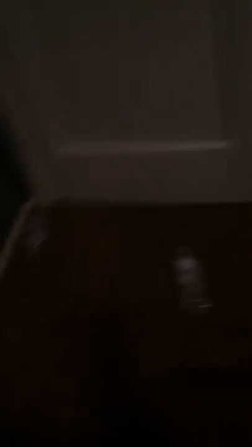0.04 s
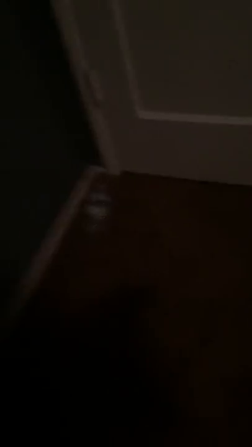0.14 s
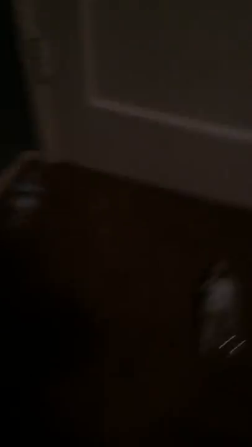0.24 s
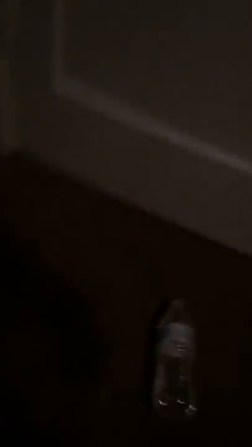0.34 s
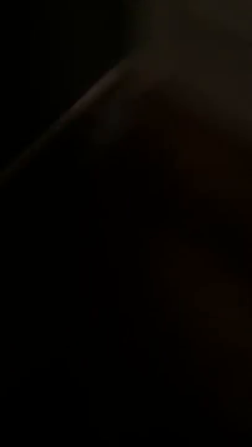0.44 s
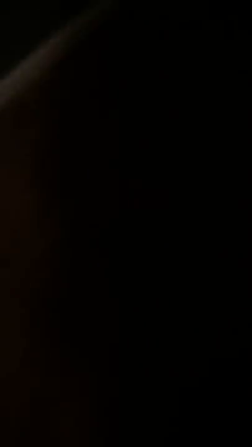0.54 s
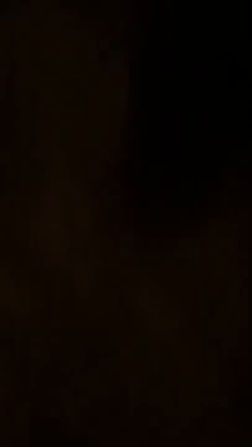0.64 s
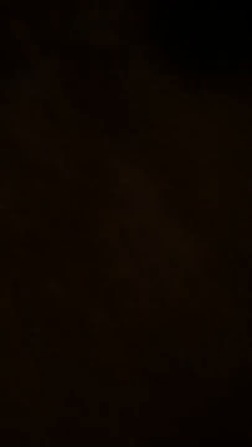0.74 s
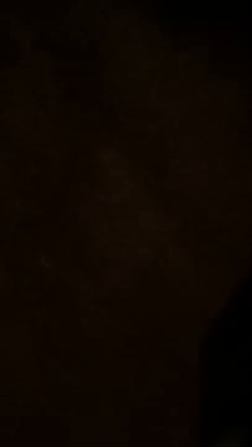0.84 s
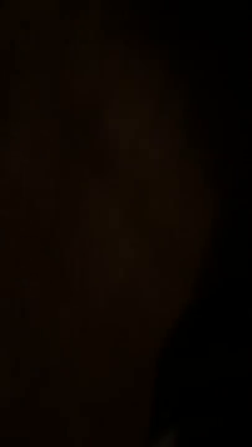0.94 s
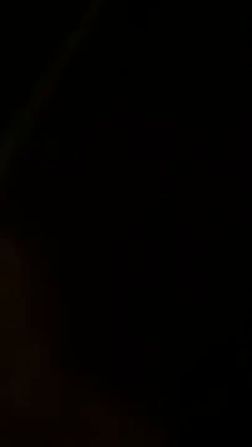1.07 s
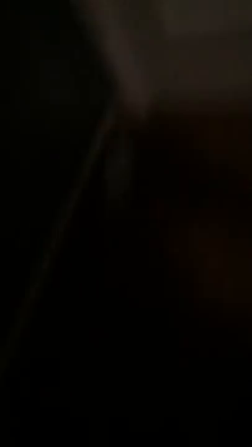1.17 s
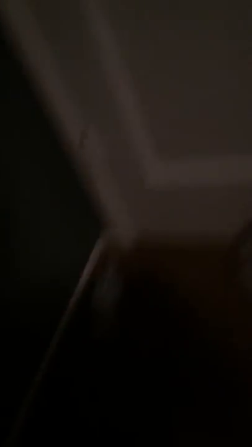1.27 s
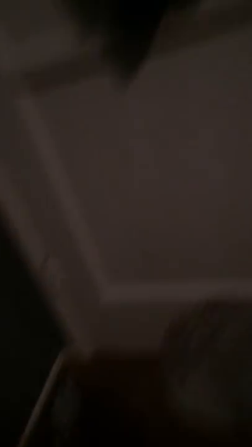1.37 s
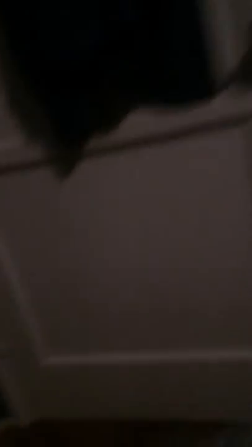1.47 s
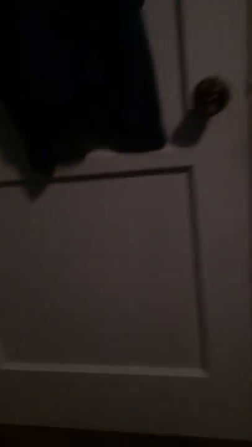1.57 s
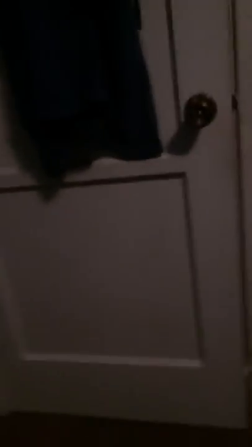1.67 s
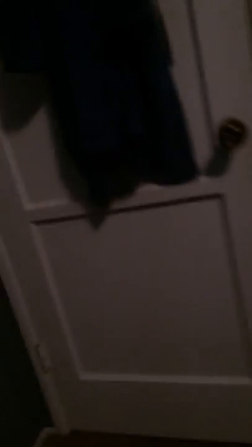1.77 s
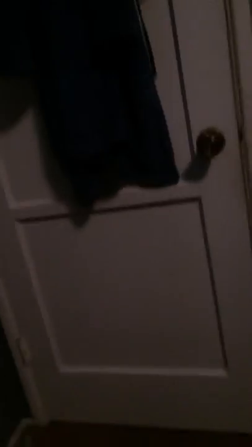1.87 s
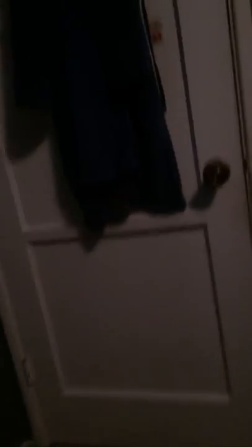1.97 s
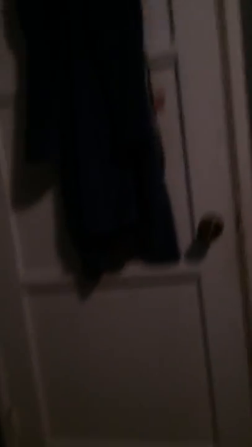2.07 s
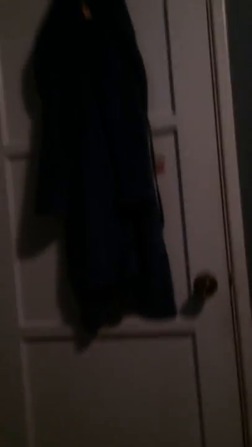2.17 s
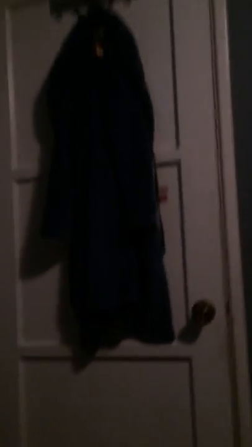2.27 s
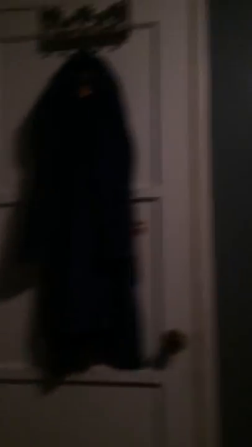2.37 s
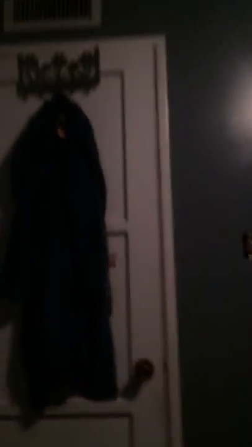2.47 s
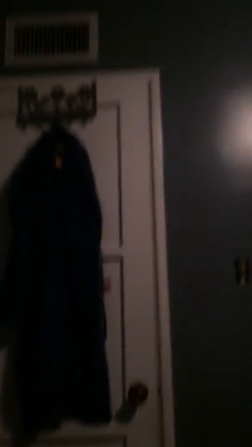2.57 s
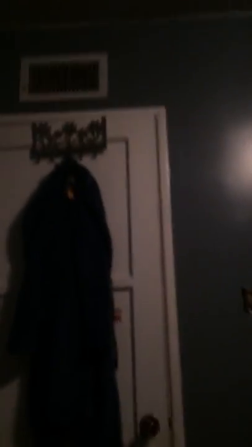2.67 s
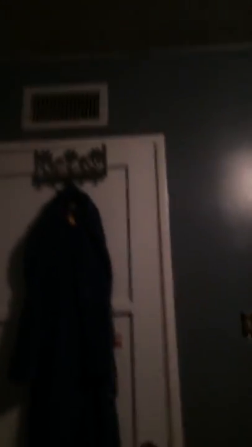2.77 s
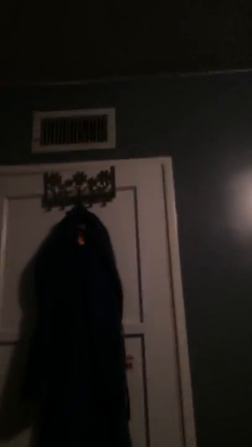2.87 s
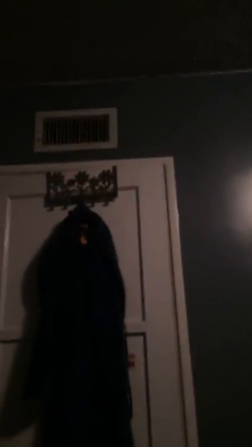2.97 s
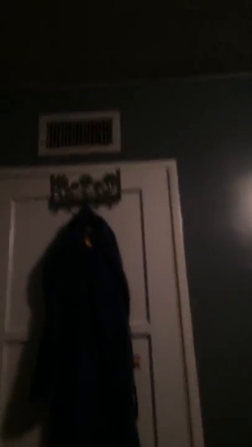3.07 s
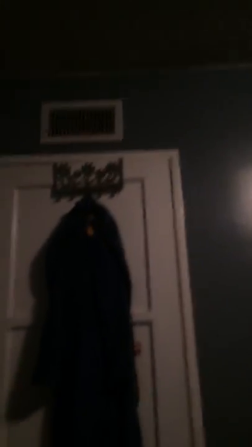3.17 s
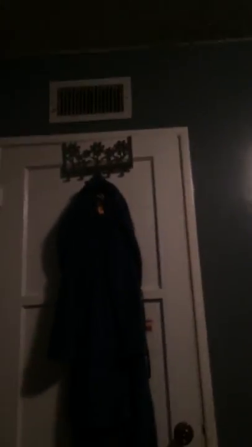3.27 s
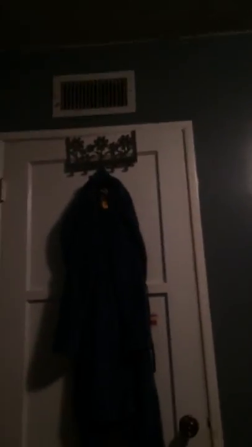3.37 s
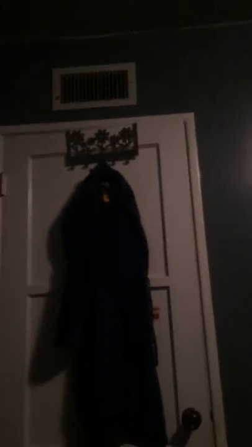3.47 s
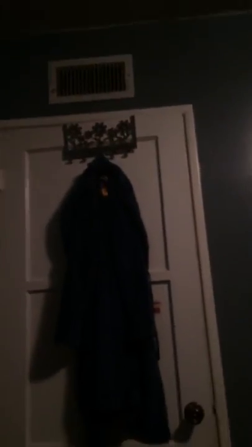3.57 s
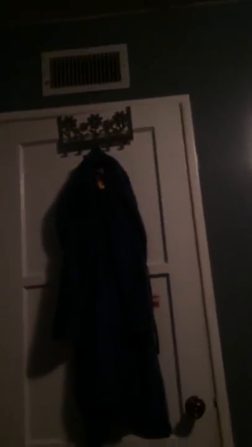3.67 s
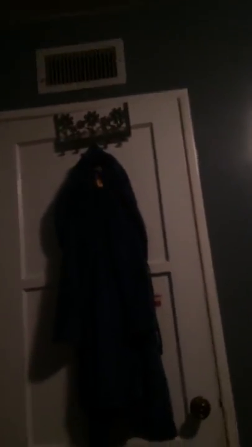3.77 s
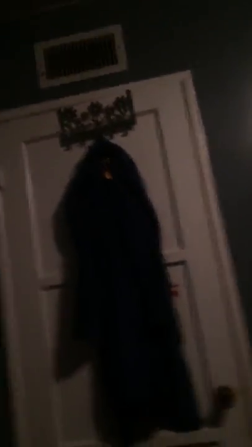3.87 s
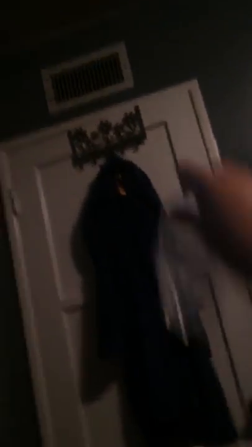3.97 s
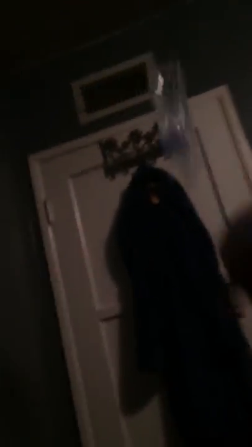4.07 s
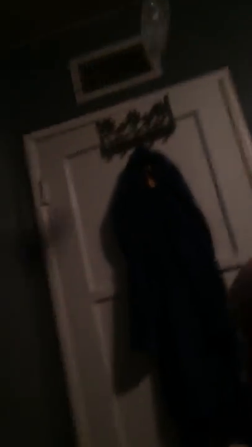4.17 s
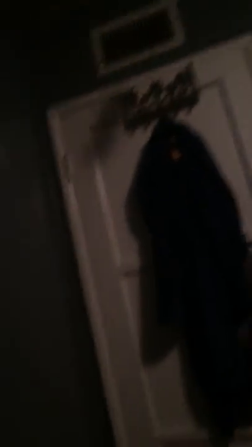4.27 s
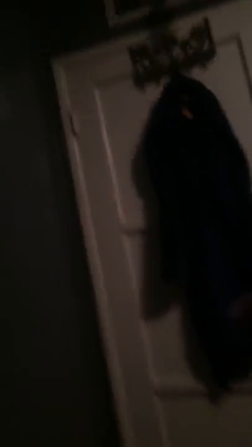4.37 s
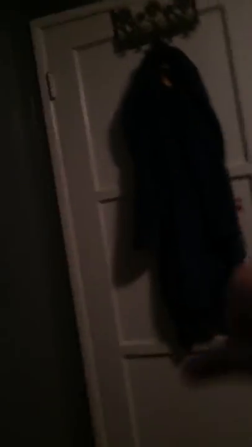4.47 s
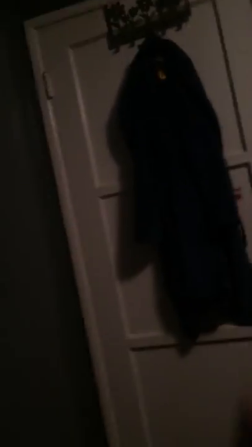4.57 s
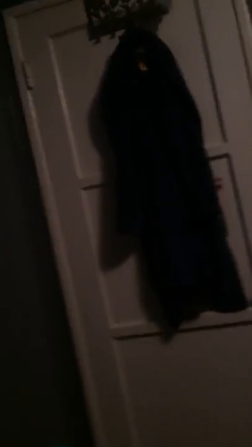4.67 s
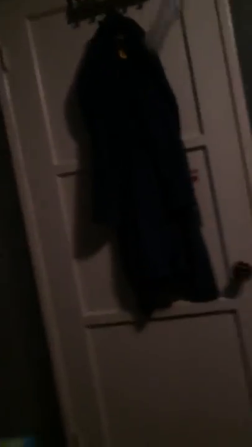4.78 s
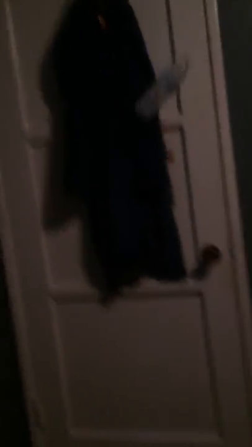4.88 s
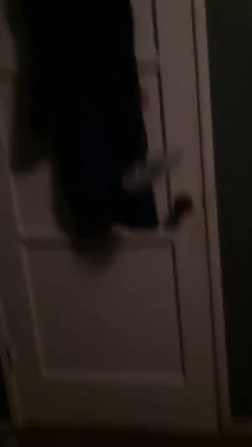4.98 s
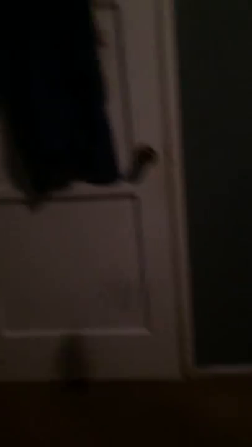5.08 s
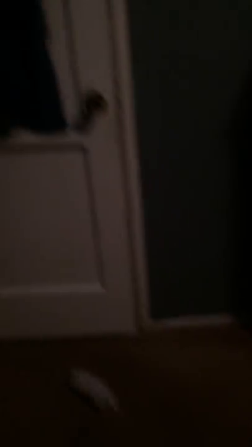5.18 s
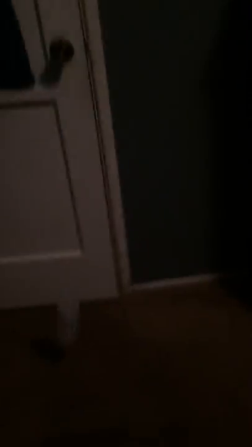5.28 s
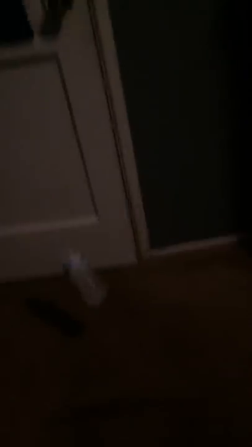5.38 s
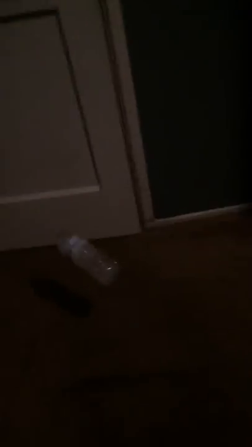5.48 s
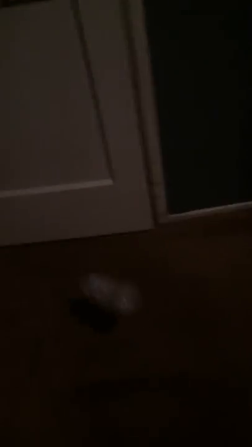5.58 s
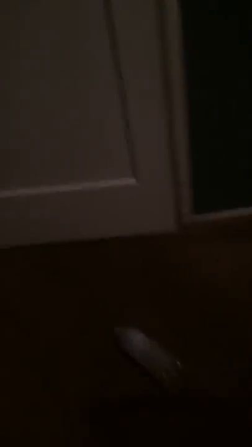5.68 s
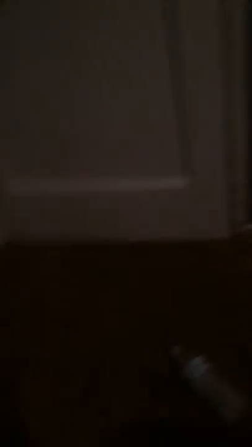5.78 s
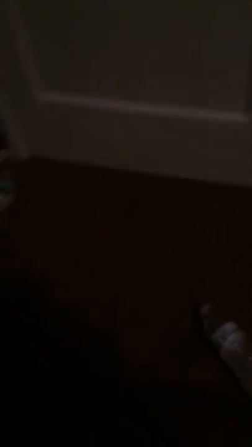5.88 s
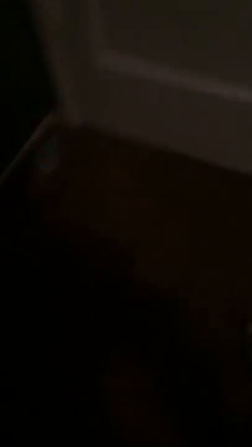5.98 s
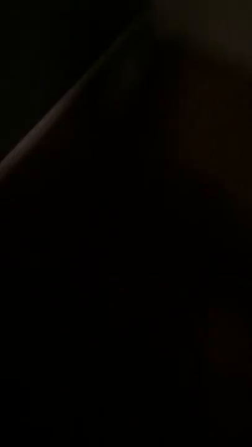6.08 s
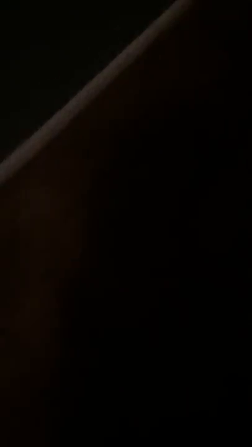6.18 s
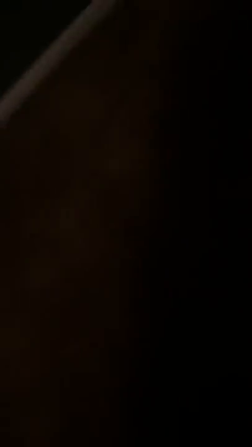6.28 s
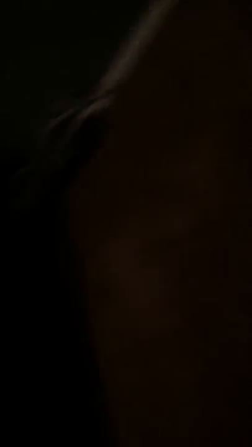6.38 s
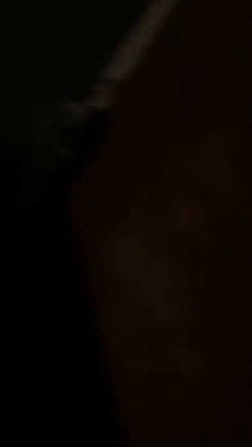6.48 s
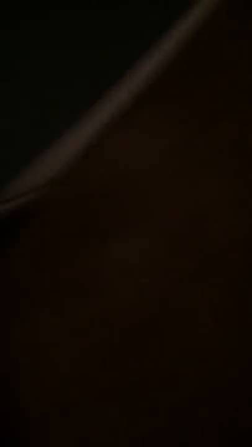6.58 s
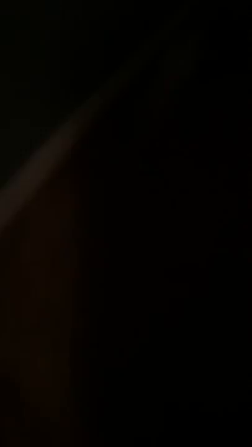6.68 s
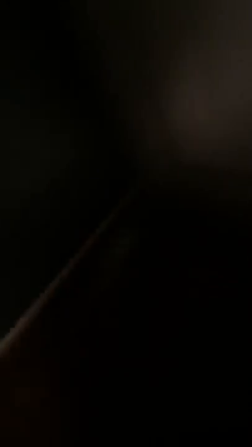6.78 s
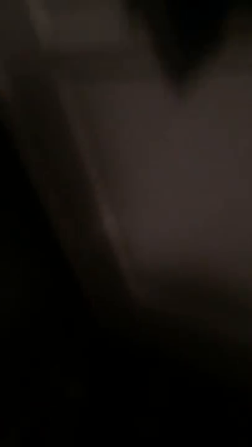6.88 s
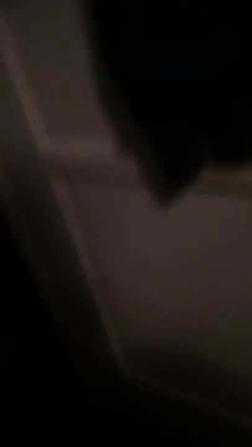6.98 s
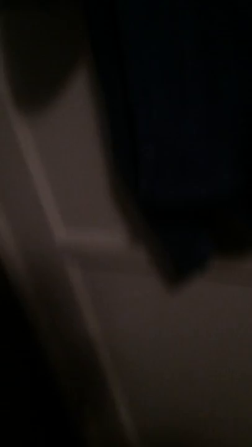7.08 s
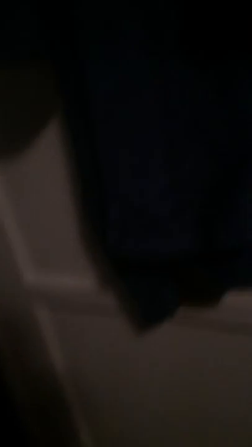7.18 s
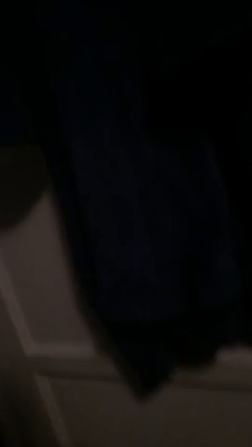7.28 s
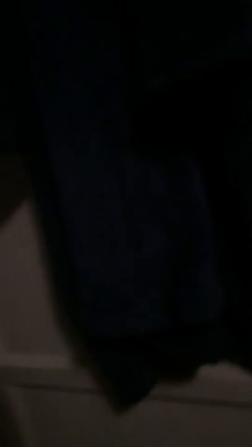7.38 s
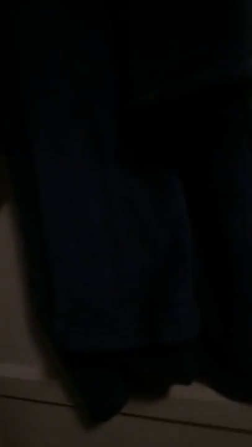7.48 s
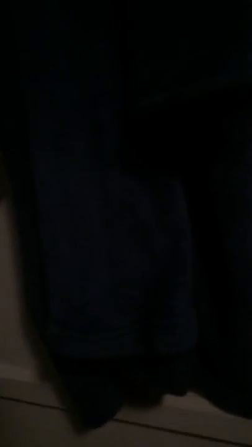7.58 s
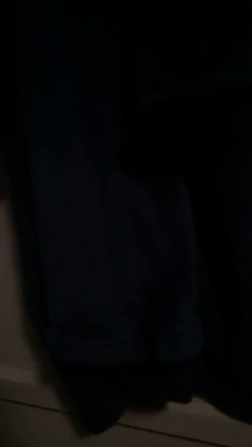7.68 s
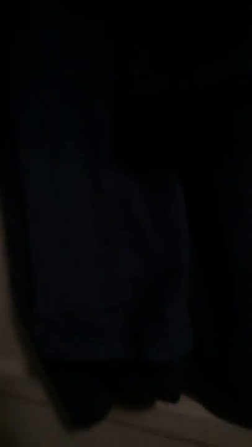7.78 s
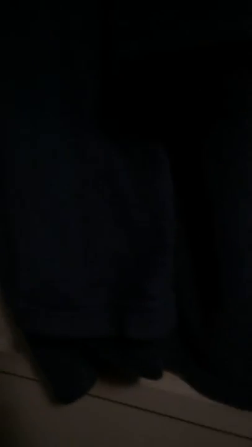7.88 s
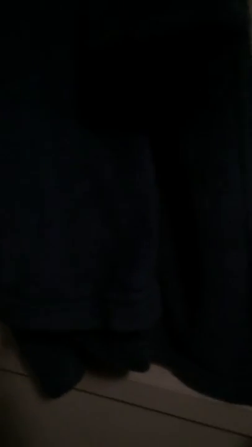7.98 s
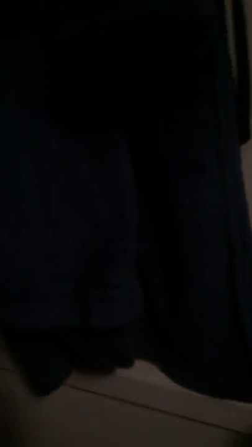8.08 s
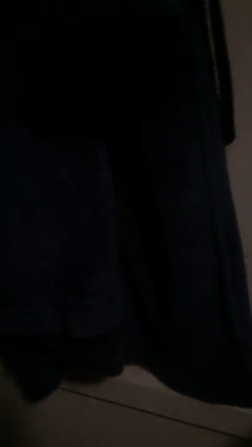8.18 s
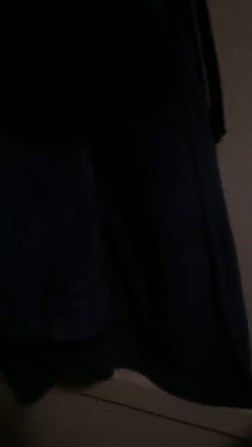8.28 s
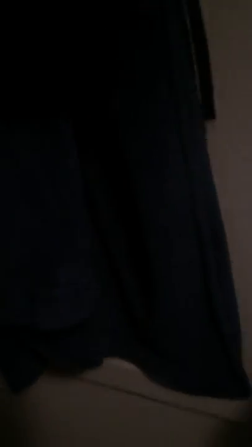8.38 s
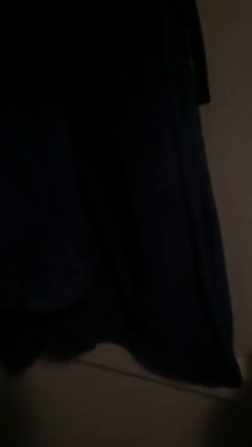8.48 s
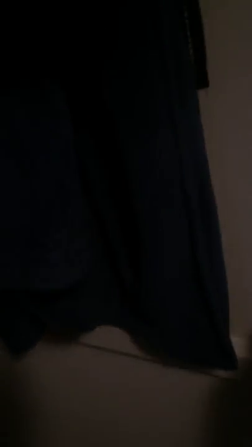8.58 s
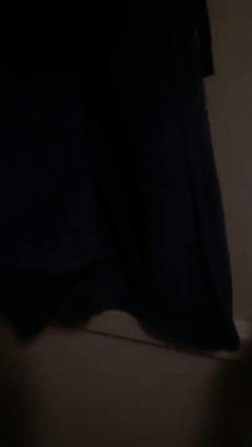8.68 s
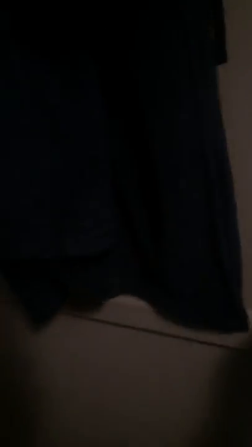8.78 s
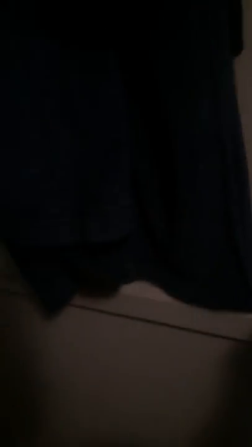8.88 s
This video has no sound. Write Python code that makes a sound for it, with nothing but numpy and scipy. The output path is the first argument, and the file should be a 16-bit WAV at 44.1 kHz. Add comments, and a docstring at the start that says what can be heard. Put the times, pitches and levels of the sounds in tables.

```python
"""A plastic bottle is thrown at a wooden bedroom door: it crunches and the panel bangs (damped modes and noise).
A metal coat rack on the door rings and rattles (beating modes, ticks); the bottle thuds on the floor and bounces.
Close by, its thin wall snaps, pops and groans (spikes, resonances, bending tones) as the thrower handles it.
Clothes rustle (grainy noise that follows each stroke), feet thump the boards (soft low resonances),
and a hand shifts on the microphone; a short room tail and quiet air lie behind."""
import sys
import numpy as np
from scipy import signal
from scipy.fft import rfft, irfft, next_fast_len
from scipy.io import wavfile
from scipy.ndimage import uniform_filter1d, map_coordinates

SR = 44100
rng = np.random.default_rng(int(sys.argv[2]) if len(sys.argv) > 2 else 0)


def bounce(signal):
    """Save signal as a 16-bit WAV file at the path given by the first command-line argument."""
    frames = np.transpose(np.atleast_2d(signal))
    limited = np.clip(frames, -1, 1)
    pcm = np.round(limited * 32767).astype(np.int16)
    wavfile.write(sys.argv[1], SR, pcm)


N = 394254
TIME = np.arange(SR) / SR  # the life of one blow (s)
NOW = np.arange(N) / SR  # the whole scene (s)
TOP_HZ = 15600  # nothing sounds above this

# Dense upper modes of the door panel: pitch_hz [Hz], level_db [dB per Hz]
PANEL_COLOUR = [(60, -3.5), (150, -5.5), (650, -7.5), (1700, -10.5), (2400, -14), (8000, -19.5),
                (15000, -31)]
# How long the panel's bands ring: pitch_hz [Hz], t60_s [s]
PANEL_T60 = [(150, 0.6), (700, 0.33), (3000, 0.3), (12000, .25)]


def door():
    """The bottle's wall crunches in quick stages; its hard cap knocks and the wooden panel bangs."""
    # The bottle crumples against the door: start_s [s], panel_db [dB], crunch_db [dB]
    blows = [(4.556, -20.5, -26), (4.5693, -28.5, -23), (4.5722, -28, -17.5), (4.579, -15, -24),
             (4.5928, -22, -26)]
    # Crumpling plastic: pitch_hz [Hz], level_db [dB per Hz]
    crunch_colour = [(200, 0), (1500, 0), (4500, -1.5), (8000, -9), (12000, 1), (15500, -11)]
    give_s = 0.0061  # the soft wall gives way at first touch, so the bang swells in
    out = np.zeros(N)
    cap = amp(-2.5) * np.sin(2 * np.pi * 1800 * TIME) * fade(t60=0.029, rise=.0001)
    for start_s, panel_db, crunch_db in blows:
        low_wood = ring(door_modes(), rise=.0006, scatter_db=1)
        dense_wood = burst(PANEL_COLOUR, PANEL_T60, rise=.0004)
        wood = .45 * low_wood + .5 * dense_wood
        contact = amp(3.5) * noise(PANEL_COLOUR, SR) * fade(t60=0.027, rise=.0001)
        crunch = noise(crunch_colour, SR) * fade(t60=0.063, rise=0.00078)
        add(out, start_s, amp(panel_db) * (cap + contact + wood) + amp(crunch_db) * crunch)
    since_touch = np.maximum(NOW - blows[0][0], 0)
    return out * (1 - np.exp(-since_touch / give_s))


def door_modes(below_hz=TOP_HZ):
    """The door's modes with their ring times: the low ones last longest."""
    # Door panel and its metal fittings: pitch_hz [Hz], level_db [dB]
    modes = [(75, -8), (112, -6), (150, -9), (172, -8), (222, -7), (261, -3), (325, -2), (357, -1),
             (510, -10), (564, -6), (721, -7), (1211, -8), (1427, -10), (1669, -5), (1813, -4), (1936, -8),
             (2809, -8), (9197, -3), (12050, -13)]
    base_s, cycles = .16, 37  # every mode rings this long, plus this many of its own cycles
    return [(hz, db, base_s + cycles / hz) for hz, db in modes if hz < below_hz]


def shudders():
    """The struck door sways against its frame with a low, broken hum and a dull wooden rumble."""
    # The hum after the blow: strongest_s [s], half_s [s], level_db [dB]
    strongest_s, half_s, level_db = (5.0, 0.18, -44)
    hum_hz = 111
    hum = np.sin(2 * np.pi * hum_hz * NOW)
    dull = lambda hz: 1 / (1 + (hz / (2 * hum_hz)) ** 2)
    rumble = unit(filtered(noise(PANEL_COLOUR, N), dull))
    broken = unit(amp(4 * wobble(rate=30)))
    return amp(level_db) * swell(strongest_s, half_s) * (hum + 0.64 * rumble) * broken


def rack(count=40):
    """Each contact of the steel rack ticks, starts its ring and knocks the door; scrollwork rings faintly."""
    # The blow jolts the rack through its hooks: start_s [s], ring_db [dB], tick_db [dB]
    jolt = (4.572, -50, -27)
    # Then it chatters on the door: start_s [s], ring_db [dB], tick_db [dB]
    rattles = [(4.692, -70.5, -42), (4.803, -68, -53.5), (4.898, -59.5, -46.5), (5.006, -69.5, -54),
               (5.078, -78.5, -64), (5.151, -75, -62)]
    # The rack's clearest modes: pitch_hz [Hz], jolted_db [dB], chattering_db [dB]
    clear_modes = [(2428, -8, -4), (2659, -3, -3), (3155, 16, -10), (4054, 7, -2), (5130, -4, -1),
                   (5491, -4, -5), (5785, -4, -6), (6062, -4, -4), (6358, 7, -12), (6858, -4, -4),
                   (7144, 3, -9), (8672, -6, -6), (9509, 0, -3), (10040, -6, -7)]
    # Steel on steel: pitch_hz [Hz], level_db [dB per Hz]
    tick_colour = [(900, -23.5), (2000, -7), (2750, 9), (3800, -16), (5300, -3), (7600, -10), (10300, 3.5),
                   (15000, -18)]
    t60_s = 0.5
    # The scrollwork is a crowd of modes at random pitches
    crowd_hz = 4400 * 2.9 ** rng.random(count)
    scrollwork = np.sin(2 * np.pi * crowd_hz[:, None] * TIME) * fade(t60_s, rise=.001) / np.sqrt(count)
    jolted = [(hz, db, t60_s) for hz, db, _ in clear_modes]
    chattering = [(hz, db, t60_s) for hz, _, db in clear_modes]
    contacts = [(jolt, jolted)] + [(row, chattering) for row in rattles]
    out = np.zeros(N)
    for (start_s, ring_db, tick_db), modes in contacts:
        metal = ring(beating(modes), rise=.0005, scatter_db=2)
        metal = metal + rng.standard_normal(count) @ scrollwork
        tick = noise(tick_colour, SR) * fade(t60=0.14, rise=0.00046)
        low_wood = amp(-3) * ring(door_modes(below_hz=1500), rise=.002, scatter_db=1.5)
        dense_wood = amp(-3.5) * burst(PANEL_COLOUR, PANEL_T60, rise=.002)
        add(out, start_s, amp(ring_db) * metal + amp(tick_db) * (tick + low_wood + dense_wood))
    return out


def beating(modes):
    """Near-alike hooks give each mode a weaker twin at a slightly different pitch: the ring fades unevenly."""
    scatter_hz, twin_db = 35.3, -4
    twins = [(hz + scatter_hz * rng.standard_normal(), db + twin_db, t60) for hz, db, t60 in modes]
    return modes + twins


def landings():
    """The falling bottle booms the floorboards and slaps with its plastic shell."""
    # The bottle lands and bounces: start_s [s], boom_db [dB], slap_db [dB]
    falls = [(5.258, -27, -47), (5.2677, -10.5, -19), (5.739, -18.5, -39.5), (5.7443, -42, -28.5),
             (5.7892, -28.5, -30)]
    # Floorboard modes: pitch_hz [Hz], level_db [dB], t60_s [s]
    boards = [(75, -2, .23), (111, 1, .25), (147, 2, .18), (172, -4, .17), (228, -15, .15), (371, -16, .24),
              (500, -20, .15), (651, -19, .17)]
    # Slap of the shell: pitch_hz [Hz], level_db [dB per Hz]
    slap_colour = [(100, 12), (350, 2.5), (600, -5), (1800, -3.5), (2600, -7.5), (4200, -6.5),
                   (8000, -11.5), (15000, -20)]
    # How long the slap's bands ring: pitch_hz [Hz], t60_s [s]
    slap_t60 = [(300, 0.28), (1500, 0.19), (5000, 0.2), (13000, 0.17)]
    out = np.zeros(N)
    boom = ring(boards, rise=.0025, scatter_db=0)
    for start_s, boom_db, slap_db in falls:
        contact = amp(1.0) * noise(slap_colour, SR) * fade(t60=0.15, rise=0.00067)
        slap = contact + amp(-1.5) * burst(slap_colour, slap_t60, rise=0.0022)
        add(out, start_s, amp(boom_db) * boom + amp(slap_db) * slap)
    return out


def snaps():
    """A patch of wall flips over: one sharp pressure spike and a spray of crackle, then its short ring."""
    # The wall buckles and things in the hand click: start_s [s], level_db [dB], centre_hz [Hz], t60_s [s]
    clicks = [(.42, -44.5, 670, 0.045), (.482, -50.5, 2000, .03), (.6, -43, 2280, 0.018),
              (.673, -35, 1180, 0.024), (.745, -43.5, 2700, 0.028), (.8575, -38.5, 5180, .035),
              (1.028, -37.5, 2350, 0.039), (1.0895, -31.5, 960, 0.046), (2.06, -51.5, 3960, 0.14),
              (2.238, -51.5, 5230, 0.037), (3.175, -46.5, 8250, 0.019), (3.989, -46.5, 3520, 0.016),
              (4.0579, -43.5, 1383, .025), (4.095, -37, 7760, 0.019), (4.181, -40.5, 1555, .05),
              (4.256, -49.5, 1890, .045), (4.336, -49.5, 1396, .07), (4.399, -53.5, 2196, 0.022),
              (6.238, -34, 651, 0.034), (6.3, -43, 2350, 0.08), (6.4155, -17.5, 2682, 0.018),
              (6.4184, -20.5, 6540, 0.032), (6.493, -25, 5406, 0.046), (6.6358, -23.5, 1728, .022),
              (6.6366, -29, 6820, 0.033), (6.666, -29, 892, 0.018), (6.7248, -24.5, 2540, 0.035),
              (6.948, -34.5, 1191, 0.059), (7.01, -35.5, 3358, 0.021), (7.088, -42.5, 1000, 0.048),
              (7.766, -56.5, 2465, 0.032), (7.9932, -48, 900, 0.025)]
    out = np.zeros(N)
    u = TIME / .00008  # time in spike lengths
    for start_s, level_db, centre_hz, t60_s in clicks:
        spike = 7 * (1 - u) * np.exp(-u)
        spray = 1.6 * rng.standard_normal(SR) * fade(t60=0.0017, rise=.00005)
        crack = amp(level_db / 2) * (spike + spray)  # harder snaps are brighter
        add(out, start_s, amp(level_db) * (0.58 * patch(centre_hz, t60_s, rough=1.62) + crack))
    return out


def taps():
    """A soft fingertip rings the taut wall at one clear pitch without cracking it."""
    # Fingertip touches: start_s [s], level_db [dB], pitch_hz [Hz], t60_s [s]
    touches = [(0.858, -35, 2700, 0.025), (4.145, -38, 8600, .025), (6.4776, -28, 2549, 0.023),
               (6.5797, -32, 2306, 0.031), (6.945, -28, 2760, 0.032)]
    out = np.zeros(N)
    for start_s, level_db, pitch_hz, t60_s in touches:
        add(out, start_s, amp(level_db) * patch(pitch_hz, t60_s, rough=.7))
    return out


def patch(hz, t60, rough):
    """A patch of thin wall rings at its own sagging pitch among many weaker modes."""
    sag = 0.14  # the wall slackens as it rings: share of its pitch lost in one t60
    colour = [(hz / 14, -15), (hz / 5, -8), (hz / 1.4, -7), (hz, 0),
              (hz * 1.4, -6), (hz * 2.4, -12), (hz * 6, -28), (hz * 14, -45)]
    pitch = hz * (1 - sag * np.minimum(TIME / t60, 1))
    tone = np.sin(2 * np.pi * np.cumsum(pitch) / SR)
    return (rough * noise(colour, SR) + tone) * fade(t60, rise=.0001)


def pops():
    """The knocked bottle answers with the hollow note of its body; one low thump comes with the throw."""
    # Hollow notes, and the low thump of the throw: start_s [s], level_db [dB], pitch_hz [Hz], t60_s [s]
    notes = [(.8605, -37, 370, 0.054), (.866, -47, 340, 0.2), (4.081, -28.5, 279, 0.15),
             (4.082, -31, 544, 0.13), (4.186, -41.5, 117.5, 0.2), (5.748, -29, 322, 0.33),
             (5.787, -25.5, 640, 0.038), (6.232, -23, 300, 0.044), (6.495, -45, 326.7, 0.38),
             (6.666, -26, 354, 0.028), (6.928, -42, 287, 0.081), (7.767, -37, 157, 0.11),
             (7.994, -35, 373, 0.053)]
    return thumps(notes, rough=0.38, skirt_db=-25.5, rise_cycles=0.41)


def groans():
    """Under slow pressure the hollow bottle gives a low, wavering note that bends upward."""
    # Squeezes: strongest_s [s], half_s [s], level_db [dB], pitch_hz at the strongest moment, before waver [Hz]
    squeezes = [(0.627, 0.0083, -40, 378), (6.302, 0.01, -38.5, 390), (6.348, 0.0094, -30.5, 215),
                (6.541, 0.024, -38, 221)]
    bend_octaves, waver_octaves = .16, 0.07  # reach of the bend each way from the middle, and unsteadiness
    out = np.zeros(N)
    for strongest_s, half_s, level_db, pitch_hz in squeezes:
        bend = bend_octaves * np.tanh((NOW - strongest_s) / half_s)
        octaves = bend + waver_octaves * wobble(rate=200)
        note = np.sin(2 * np.pi * np.cumsum(pitch_hz * 2 ** octaves) / SR)
        out += amp(level_db) * swell(strongest_s, half_s) * note
    return out


def scuffs():
    """Fingers and cloth slide over a surface that resonates."""
    # Slides: strongest_s [s], half_s [s], level_db [dB], resonance_hz [Hz]
    slides = [(6.15, 0.046, -54.5, 2003), (6.355, 0.016, -41.5, 2550), (6.358, .018, -45, 4200),
              (6.55, 0.036, -47, 2080), (7.03, 0.015, -45.5, 2670), (7.13, 0.015, -44, 1400)]
    return friction(slides)


def clothes():
    """Cloth catches and slips in small grains: a dull rub, and a bright swish with crackling creases."""
    # Dull rub: pitch_hz [Hz], level_db [dB per Hz]
    rub_colour = [(60, 3), (200, 4), (400, 2.5), (1000, -1), (1700, -7.5), (3000, -20.5), (7000, -19),
                  (15000, -22.5)]
    # Bright swish: pitch_hz [Hz], level_db [dB per Hz]
    swish_colour = [(300, -25.5), (1050, -10.5), (1700, 0.5), (2550, -1.5), (3300, -3.5), (4400, -4.5),
                    (7000, -9.5), (15500, -16.5)]
    rub_gain, swish_gain = movement()
    grain = unit(amp(1.7 * wobble(rate=60) + 2 * wobble(rate=400)))
    rub = rub_gain * shifting(noise(rub_colour, N), patchy_db=3.5)
    swish = swish_gain * (shifting(noise(swish_colour, N), patchy_db=2.5) + 0.54 * crackle())
    return grain * (rub + swish)


def movement():
    """Gains of rub and swish: each stroke speeds up and slows down, on top of the body's slow shifting."""
    # Strokes of sleeves and trouser legs: fastest_s [s], half_s [s], rub_db [dB], swish_db [dB]
    strokes = [(0.147, 0.048, -54, -69.5), (0.33, .05, -52.5, -61.5), (0.642, 0.2, -53, -63),
               (1.049, 0.027, -43, -42.5), (1.112, .03, -45.5, -46.5), (1.785, 0.096, -57, -62.5),
               (2.683, 0.15, -58, -65), (4.091, 0.02, -49.5, -42), (4.202, 0.092, -65.5, -55.5),
               (5.809, 0.054, -49, -46), (6.166, 0.084, -52.5, -66.5), (6.533, 0.098, -52, -50.5),
               (7.002, 0.06, -53, -54), (7.142, .028, -62, -43.5), (7.326, 0.05, -84.5, -50)]
    # Slow shifting between strokes: time_s [s], level_db [dB]
    stir = [(0, -68), (1.2, -64), (2.1, -69.5), (3.1, -82.5), (3.85, -70.5), (4.45, -67.5), (5.55, -76.5),
            (5.95, -61), (6.8, -61.5), (7.45, -63.5), (7.75, -77.5), (8.9, -83.5)]
    stir_db = np.interp(NOW, *np.transpose(stir))
    rub_power = amp(stir_db) ** 2
    swish_power = amp(stir_db - 3.5) ** 2  # slow movement rubs more than it swishes
    for fastest_s, half_s, rub_db, swish_db in strokes:
        speed = swell(fastest_s, half_s)
        rub_power = rub_power + (amp(rub_db) * speed) ** 2
        swish_power = swish_power + (amp(swish_db) * speed) ** 2
    return np.sqrt(rub_power), np.sqrt(swish_power)


def shifting(x, patchy_db):
    """Folds open and close, so narrow bands of the rustle swell and sink by chance."""
    z = signal.stft(x, nperseg=512)[2]
    field = uniform_filter1d(rng.standard_normal(z.shape), size=3, axis=0)  # smooth across pitch
    field = uniform_filter1d(field, size=12, axis=1)  # smooth over time
    return unit(signal.istft(z * amp(patchy_db * unit(field)), nperseg=512)[1][:N])


def crackle(count=1500):
    """Creases let go at random: tiny damped ticks of scattered pitch, some stronger than the rest."""
    out, t = np.zeros(N), TIME[:SR // 100]
    for when, pitch, strength in rng.random((count, 3)):
        hz = 1100 * 9 ** pitch
        size = amp(-17 * (1 - strength ** 2))
        add(out, when * N / SR, size * np.sin(2 * np.pi * hz * t) * np.exp(-t * hz))
    return unit(out)


def footfalls():
    """Each step lands on the heel and rolls onto the toe, and the boards thump under it."""
    # Footfalls on the wooden floor: start_s [s], heel_db [dB]
    steps = [(0.331, -19), (0.551, -26), (1.527, -30.5), (1.642, -33), (1.72, -31.5), (6.197, -23.5),
             (6.64, -29.5), (7.489, -36.5), (7.996, -39)]
    board_hz, t60_s = 65, .19
    toe_s, toe_db = .1, -10.5  # the toe follows the heel, softer
    heels = [(s, db, board_hz, t60_s) for s, db in steps]
    toes = [(s + toe_s, db + toe_db, board_hz, t60_s) for s, db in steps]
    return thumps(heels + toes, rough=0.21, skirt_db=-24.5, rise_cycles=0.14)


def handling():
    """The hand shifts on the microphone's case, which rumbles at a low resonance."""
    # Shifts of the hand: strongest_s [s], half_s [s], level_db [dB], resonance_hz [Hz]
    shifts = [(1.568, 0.024, -30.5, 61.5), (1.8, 0.074, -47.5, 93)]
    return friction(shifts)


def room(x):
    """The short diffuse answer of a furnished bedroom: noise whose bands die at their own speeds."""
    # Room decay: pitch_hz [Hz], t60_s [s]
    room_t60 = [(100, 0.97), (500, 0.18), (3000, 0.25), (12000, .13)]
    tail = burst([(110, -7.5), (260, -3.0), (3000, -3.0), (14000, 2.5)], room_t60, rise=0.00046)
    return signal.fftconvolve(x, tail / np.linalg.norm(tail))[:N]


def air():
    """The quiet room: steady noise, strongest in the bass."""
    # Room tone: pitch_hz [Hz], level_db [dB per Hz]
    air_colour = [(20, -8.5), (54, 0), (330, -19), (3850, -37.5)]
    return amp(-65.0) * noise(air_colour, N)


def thumps(rows, rough, skirt_db, rise_cycles):
    """Soft pushes on a hollow body: one main resonance within a hump of weaker ones."""
    out = np.zeros(N)
    for start_s, level_db, hz, t60_s in rows:
        hump = noise([(hz / 5, -26), (hz, 0), (hz * 2, -7), (hz * 5, skirt_db), (hz * 20, -70)], SR)
        body = np.sin(2 * np.pi * hz * TIME) + rough * hump
        add(out, start_s, amp(level_db) * body * fade(t60_s, rise_cycles / hz))
    return out


def friction(rows):
    """Sticking and slipping feeds one resonance with fluttering noise."""
    out = np.zeros(N)
    for strongest_s, half_s, level_db, hz in rows:
        band = [(hz / 4, -36), (hz / 1.25, -10), (hz, 0), (hz * 1.25, -10), (hz * 4, -36), (hz * 16, -70)]
        out += amp(level_db) * swell(strongest_s, half_s) * noise(band, N)
    return out * unit(amp(2.5 * wobble(rate=120)))


def swell(s, half):
    """Speed of a stroke that is fastest at time s and falls to 1/e about half seconds away."""
    shape = 1.4  # 1 = peaked, 2 = rounded
    release = 1.01  # slowing down takes this much longer than speeding up
    away = np.maximum(s - NOW, (NOW - s) / release) / half
    return np.exp(-np.minimum(away, 10) ** shape)


def ring(modes, rise, scatter_db):
    """Damped modes (Hz, dB, t60 s), each level scattered at random by scatter_db."""
    out = np.zeros(SR)
    for hz, db, t60 in modes:
        level = amp(db + scatter_db * rng.standard_normal())
        out += level * np.sin(2 * np.pi * hz * TIME) * fade(t60, rise)
    return out


def burst(spectrum, decays, rise):
    """Modes too dense to tell apart: noise whose bands die at their own speeds."""
    source = noise(spectrum, SR)
    centres = [hz for hz, _ in decays]
    out = np.zeros(SR)
    # Each band peaks at its own centre and crossfades into its neighbours
    for share, (_, t60) in zip(np.eye(len(decays)), decays):
        band = list(zip(centres, share))
        out += filtered(source, lambda hz: along(band, hz)) * fade(t60, rise)
    return out


def fade(t60, rise):
    """Envelope of a blow: quick growth, then exponential decay (both in s)."""
    return np.exp(-np.log(1000) * TIME / t60) * (1 - np.exp(-TIME / rise))


def wobble(rate):
    """A smooth random curve, rate knots a second."""
    knots = rng.standard_normal(int(N * rate / SR) + 4)
    return map_coordinates(knots, [np.arange(N) * rate / SR])


def noise(spectrum, size):
    """Coloured noise of rms 1."""
    return unit(filtered(rng.standard_normal(size), lambda hz: amp(along(spectrum, hz))))


def filtered(x, response):
    """x times a response of frequency."""
    size = next_fast_len(len(x) + 4096)
    return irfft(rfft(x, size) * response(np.fft.rfftfreq(size, 1 / SR)), size)[:len(x)]


def along(points, hz):
    """(Hz, value) points read on a log axis."""
    f, v = np.transpose(points)
    return np.interp(np.log(hz + 1), np.log(f + 1), v)


def amp(db):
    """Decibels to gain."""
    return 10 ** (np.asarray(db) / 20)


def unit(x):
    """Scale to rms 1."""
    return x / np.sqrt(np.mean(x ** 2) + 1e-20)


def add(track, s, sound):
    """Mix a sound into the track at time s."""
    part = track[round(s * SR):][:len(sound)]
    part += sound[:len(part)]


def scene():
    """Handling is near and carries more of the room's tail; the door and the floor lie across the room."""
    far = door() + rack() + landings()
    bottle = snaps() + taps() + groans() + pops()
    near = bottle + scuffs() + clothes()
    low = footfalls() + shudders() + handling()  # no room tail on these
    tail = room(amp(-8.0) * near + amp(-24.5) * far)
    return (near + far + low + tail + air())[None]


def record(dry):
    """The small microphone rolls off the deepest bass; nothing passes above the band limit."""
    corner_hz = 34
    response = lambda hz: (1j * hz / (1j * hz + corner_hz)) ** 2 * (hz < TOP_HZ)
    return np.array([filtered(channel, response) for channel in dry])


dry = scene()
out = record(dry)
bounce(out)
```